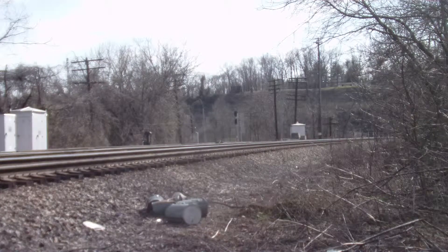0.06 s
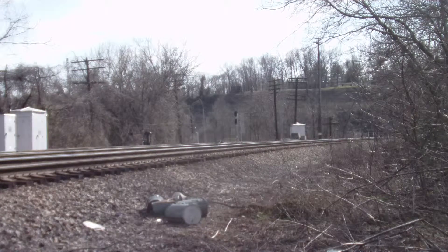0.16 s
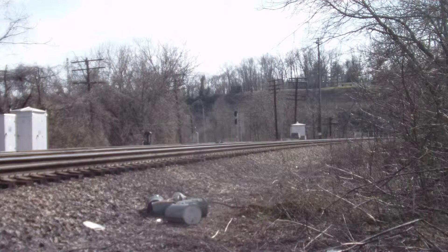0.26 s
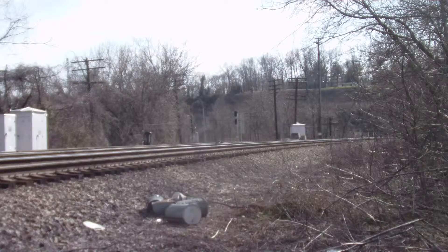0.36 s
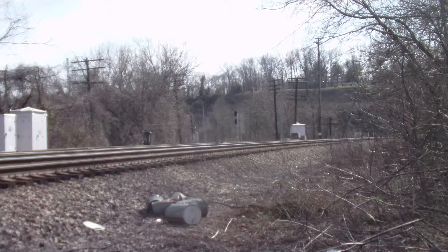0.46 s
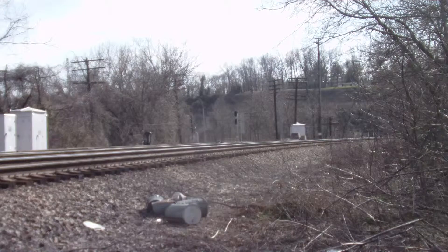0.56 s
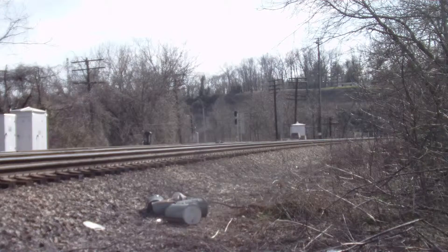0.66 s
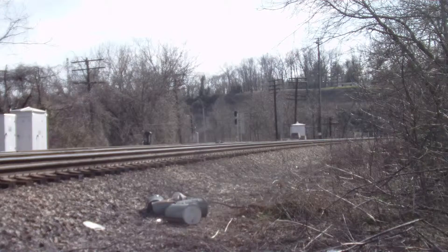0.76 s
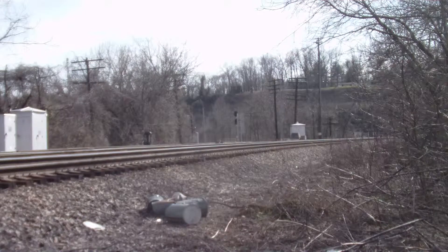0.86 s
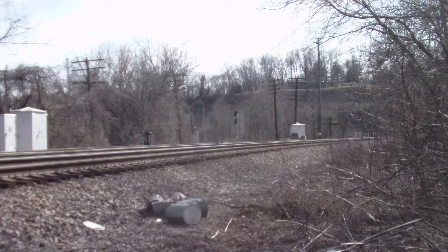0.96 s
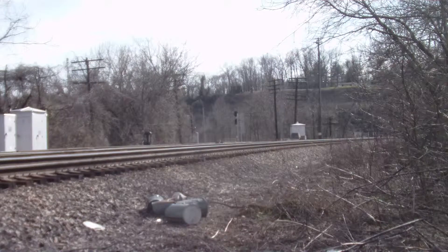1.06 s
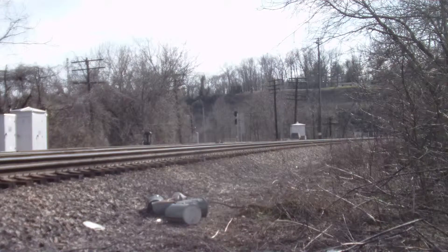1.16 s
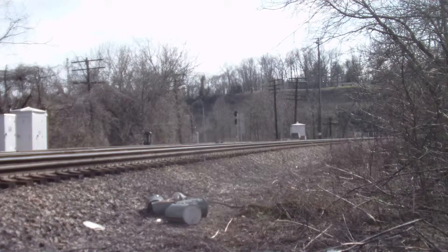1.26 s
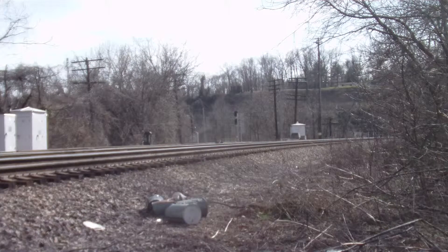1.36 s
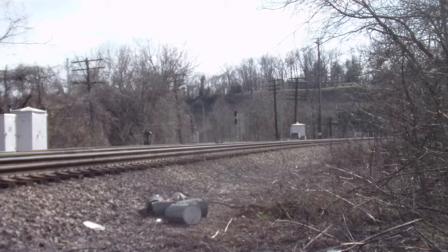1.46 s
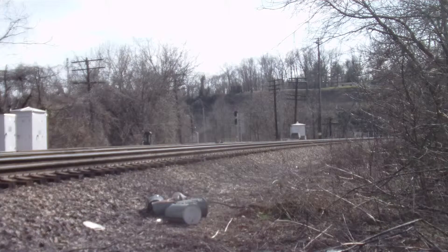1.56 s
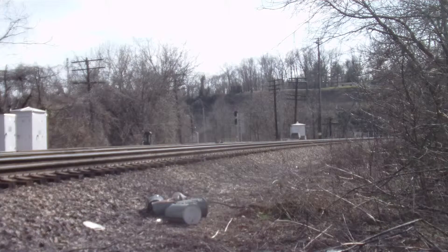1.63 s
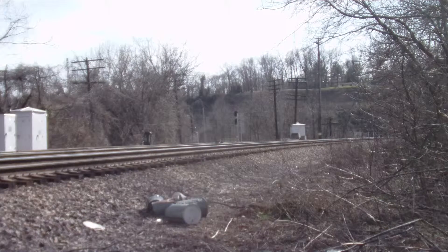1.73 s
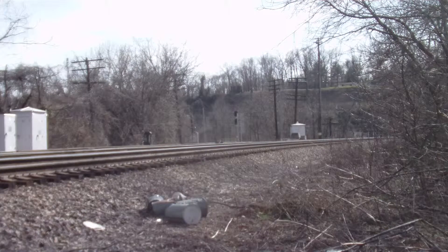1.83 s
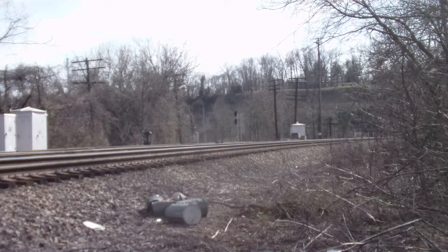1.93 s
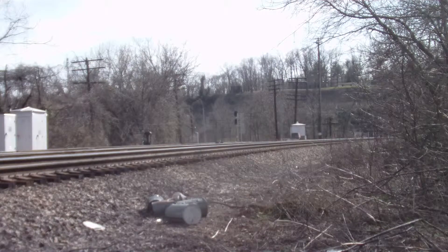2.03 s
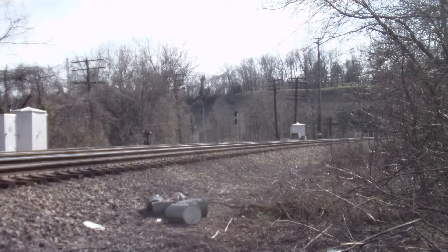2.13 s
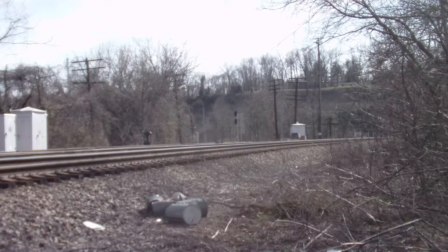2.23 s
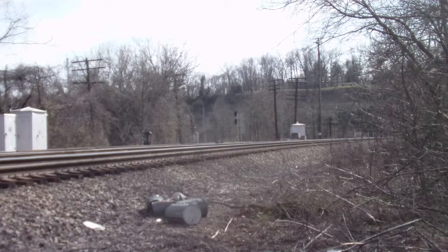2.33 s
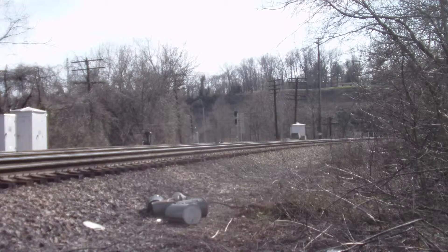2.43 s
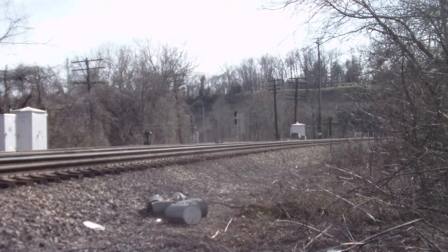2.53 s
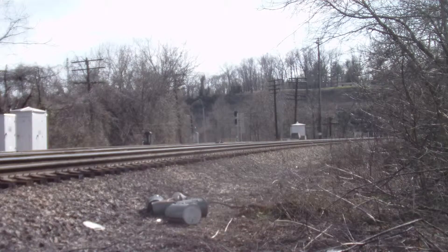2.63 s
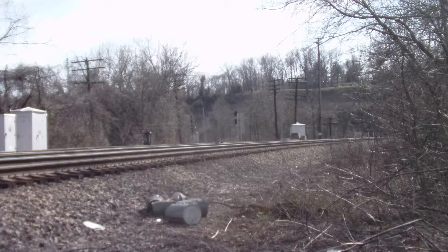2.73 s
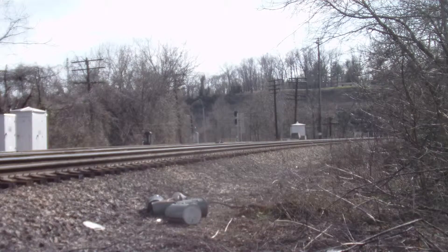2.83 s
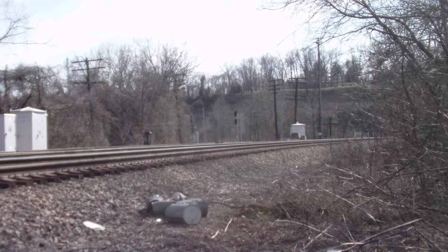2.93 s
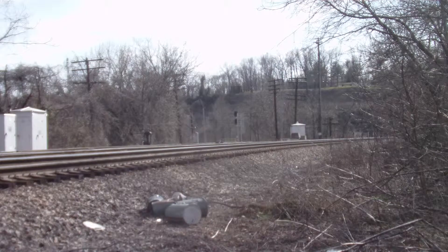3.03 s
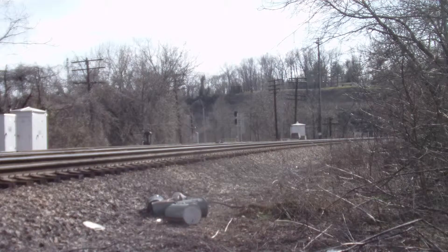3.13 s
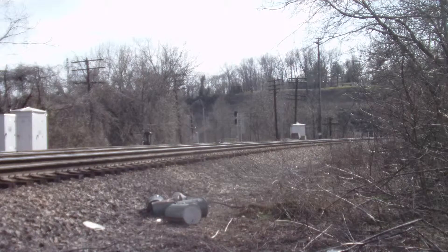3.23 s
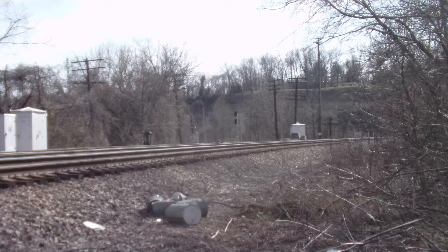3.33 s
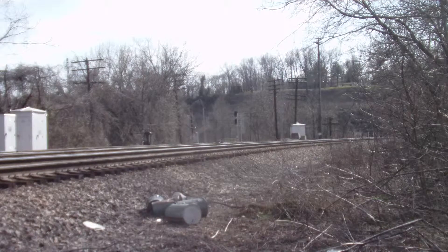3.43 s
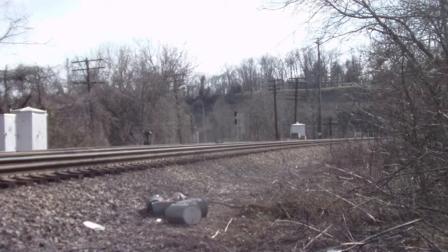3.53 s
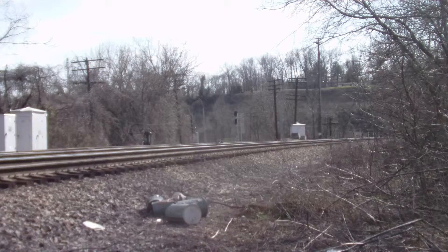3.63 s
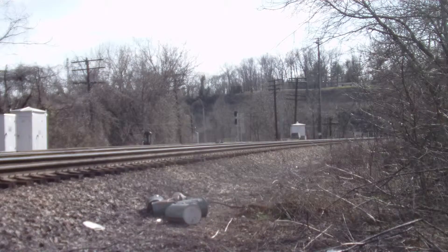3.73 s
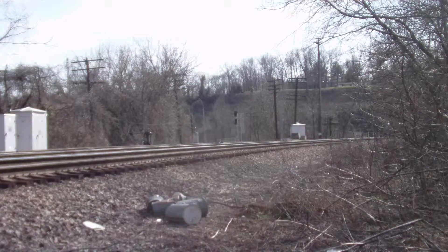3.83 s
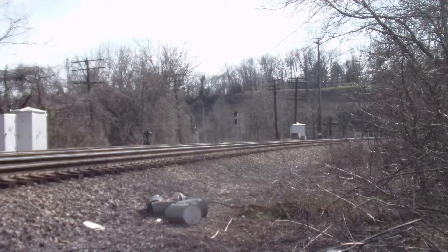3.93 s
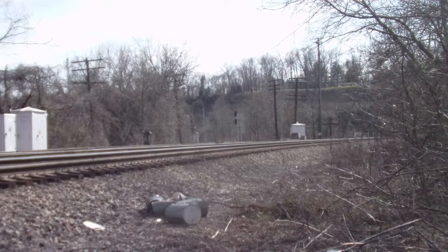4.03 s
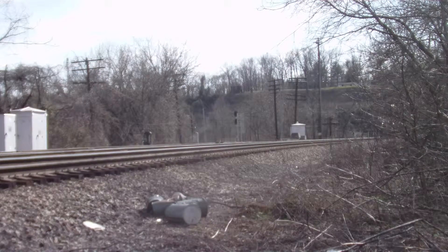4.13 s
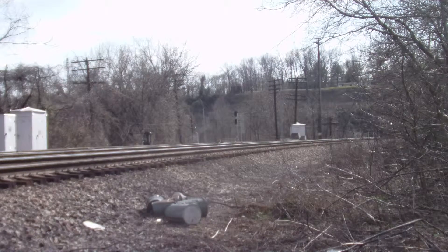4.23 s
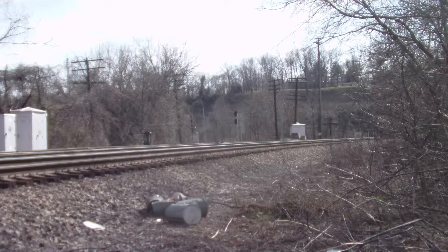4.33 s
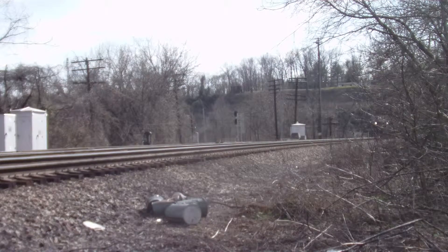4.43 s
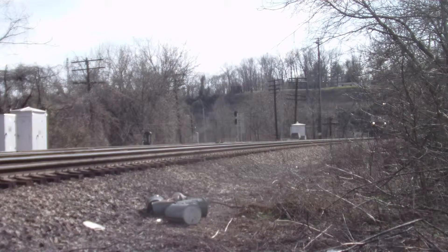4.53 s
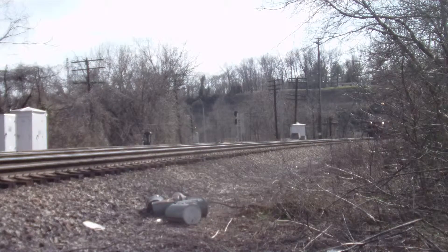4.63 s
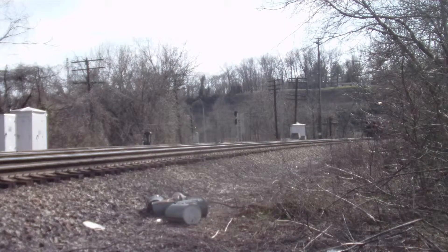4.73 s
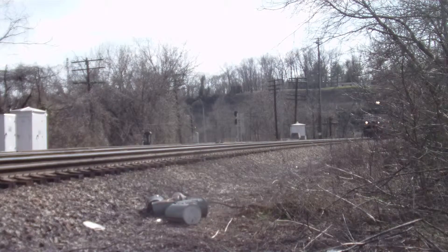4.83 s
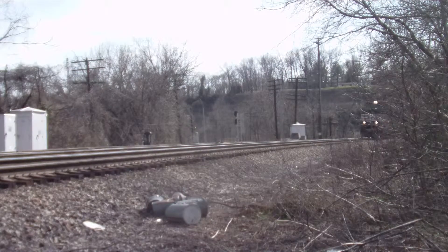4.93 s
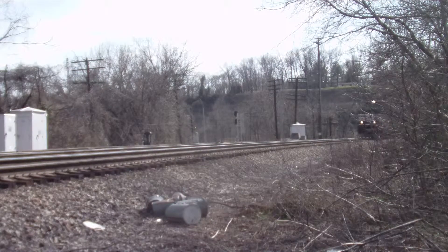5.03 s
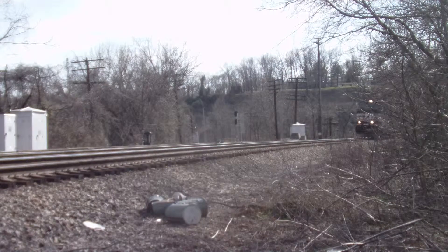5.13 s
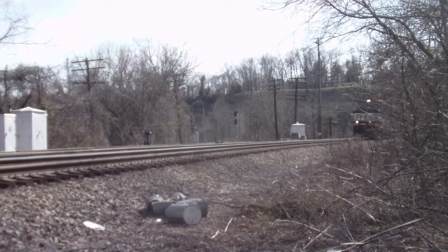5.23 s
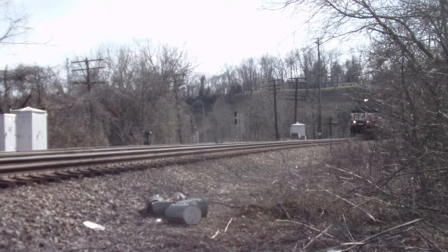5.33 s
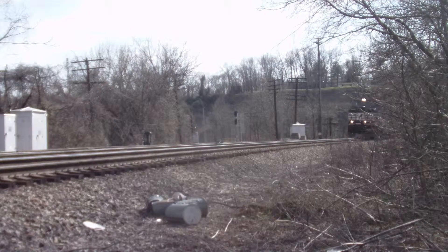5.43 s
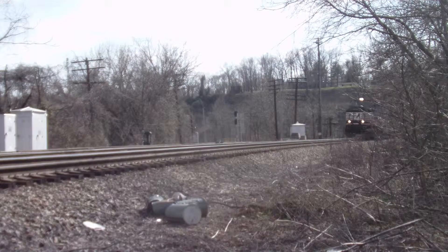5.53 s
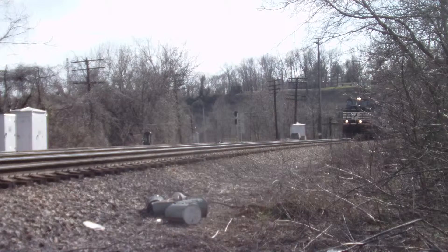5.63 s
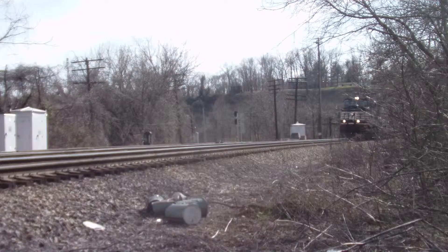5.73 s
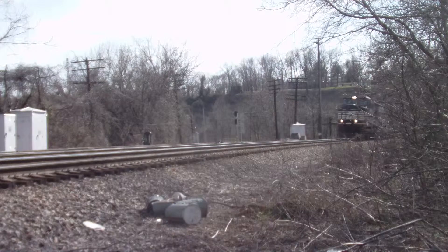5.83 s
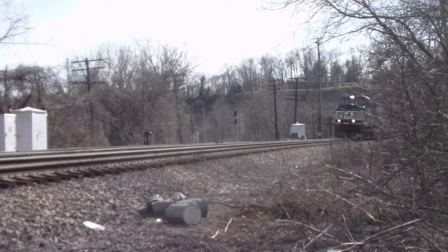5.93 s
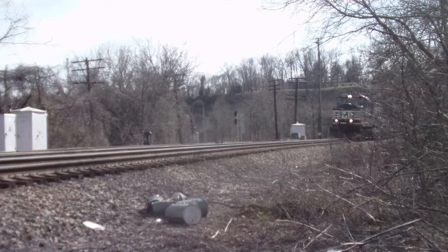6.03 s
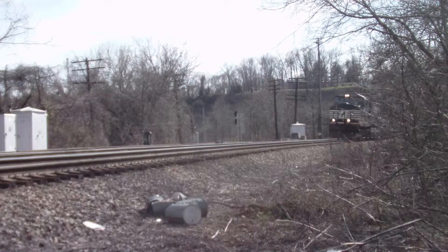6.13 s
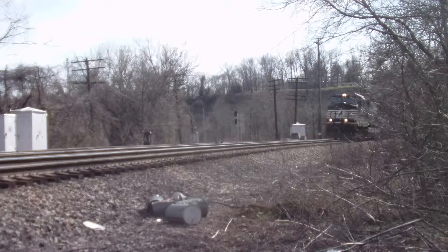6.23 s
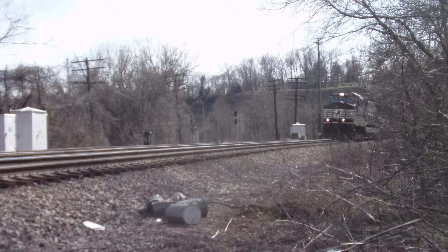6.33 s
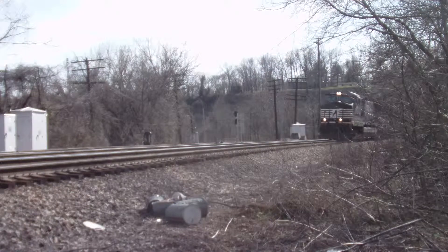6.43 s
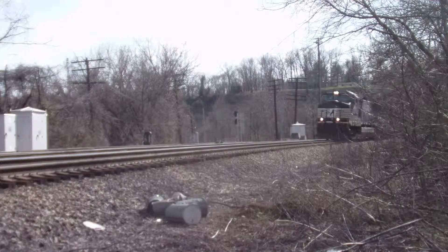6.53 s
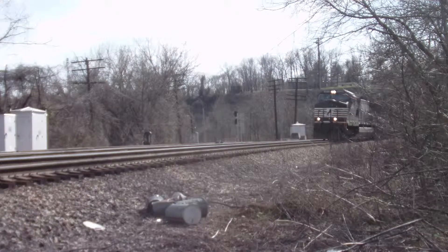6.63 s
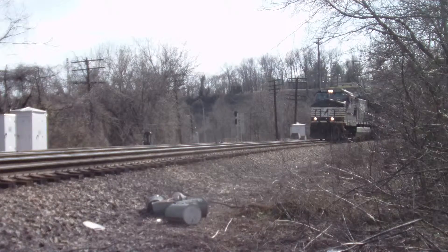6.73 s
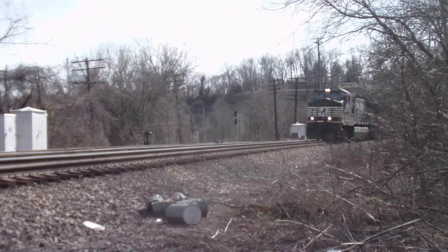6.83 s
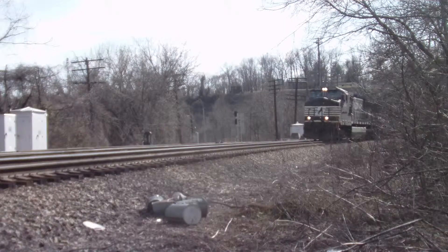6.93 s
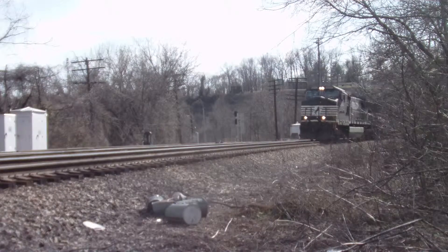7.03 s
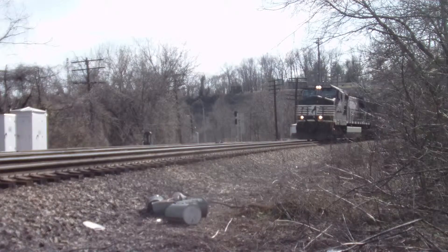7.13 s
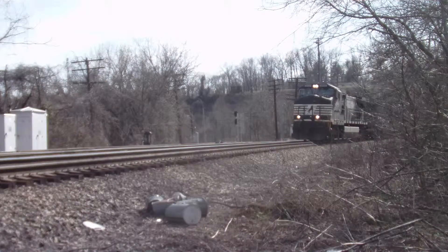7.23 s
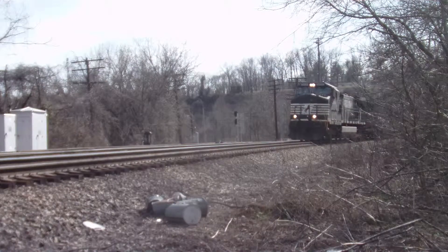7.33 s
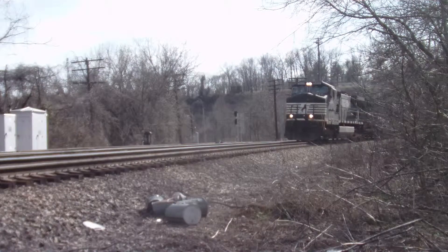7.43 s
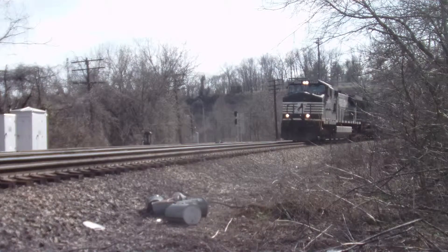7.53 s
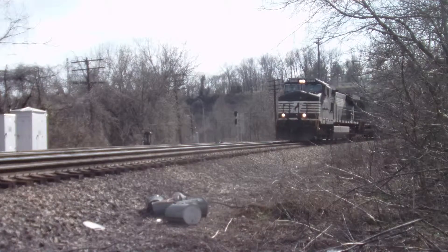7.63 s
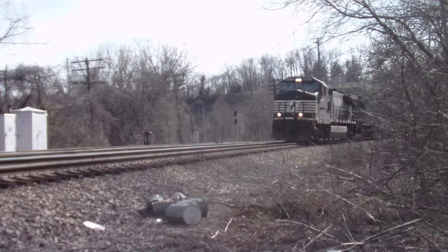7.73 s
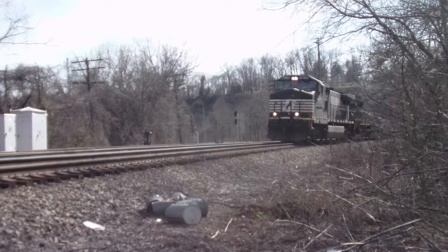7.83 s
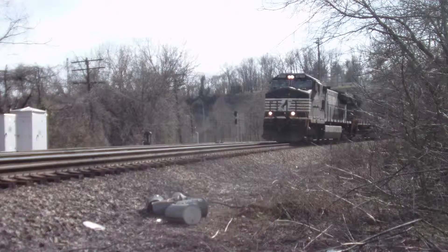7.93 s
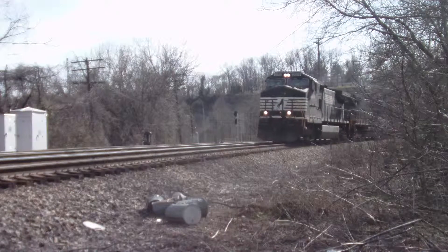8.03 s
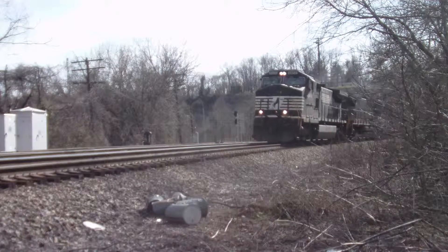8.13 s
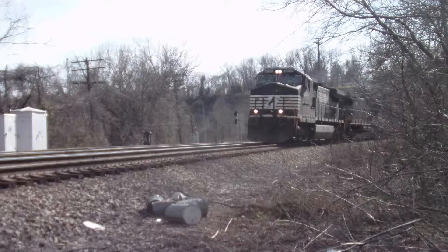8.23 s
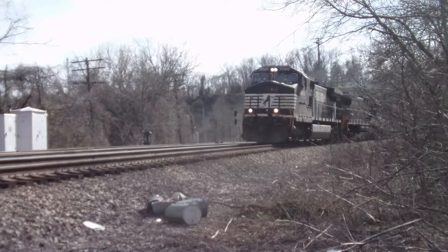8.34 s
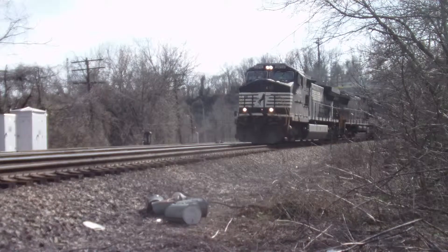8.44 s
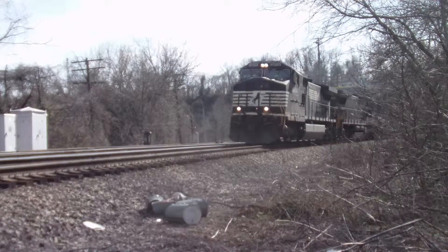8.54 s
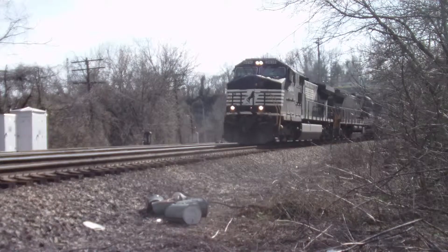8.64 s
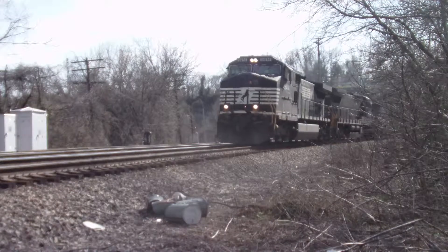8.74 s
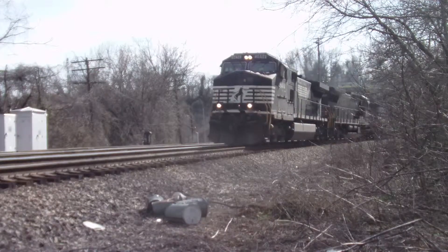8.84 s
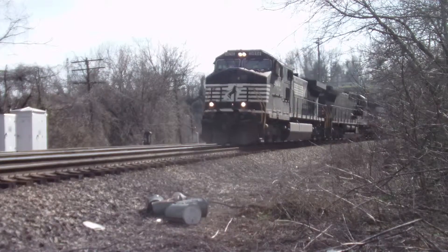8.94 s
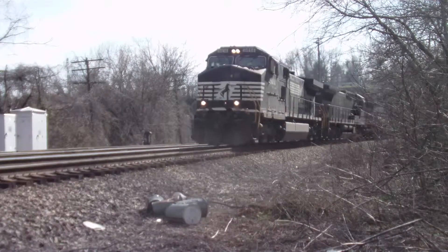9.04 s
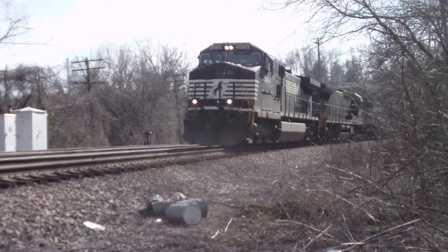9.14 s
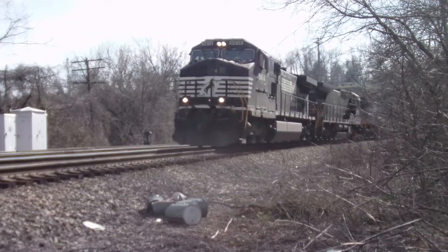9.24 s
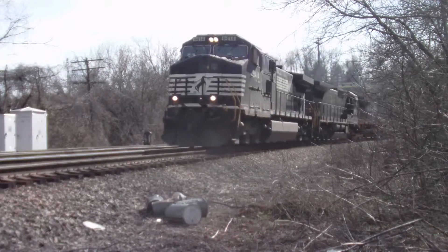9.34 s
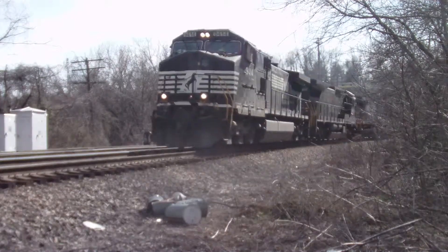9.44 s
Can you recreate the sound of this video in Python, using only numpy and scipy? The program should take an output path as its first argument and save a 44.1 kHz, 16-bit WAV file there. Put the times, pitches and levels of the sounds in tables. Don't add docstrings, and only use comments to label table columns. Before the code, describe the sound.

Beside a railway curve, hissing, thinly singing rails announce a heavy diesel freight train whose rumble and throbbing engines swell close and overload the microphone.

```python
import sys
import numpy as np
from scipy import signal
from scipy.fft import rfft, irfft, next_fast_len
from scipy.io import wavfile
from scipy.ndimage import uniform_filter1d, map_coordinates

SR = 44100
rng = np.random.default_rng(int(sys.argv[2]) if len(sys.argv) > 2 else 0)


def master(y):
    cut = np.clip(np.atleast_2d(y).T, -1, 1)
    pcm = np.round(cut * 32767)
    wavfile.write(sys.argv[1], SR, pcm.astype(np.int16))


def gain_from_db(level_db):
    decades = np.asarray(level_db, float) / 20
    return 10 ** decades


N = 417627


def unit(x):
    return x / np.sqrt(np.mean(x ** 2) + 1e-20)


def along(points, hz):
    f, v = np.transpose(points)
    return np.interp(np.log(hz + 1), np.log(f + 1), v)


def curves(rows):
    s, *cols = np.transpose(rows)
    return [np.interp(np.arange(N) / SR, s, c) for c in cols]


def wobble(rate, n=N):
    at = np.arange(0, n + 16, 16)
    knots = rng.standard_normal(int(n * rate / SR) + 5)
    return np.interp(np.arange(n), at, map_coordinates(knots, [at * rate / SR]))


def filtered(x, response):
    m = next_fast_len(N + 8192)
    return irfft(rfft(x, m) * response(np.fft.rfftfreq(m, 1 / SR)), m)[:N]


def patches(shape, bins, frames):
    field = uniform_filter1d(rng.standard_normal(shape), bins, 0)
    return unit(uniform_filter1d(field, frames, 1))


def rush(gain, patchy_db, streaky_db):
    z = signal.stft(rng.standard_normal(N + 4096), nperseg=2048)[2]
    field = patchy_db * patches(z.shape, 20, 5)
    field += streaky_db * patches(z.shape, 2, 36)
    x = signal.istft(z * gain_from_db(field), nperseg=2048)[1][:N]
    response = gain if callable(gain) else lambda hz: gain_from_db(along(gain, hz))
    return unit(filtered(x, response))


def ringing(modes, width_hz, patchy_db):
    def response(f):
        resonances = [gain_from_db(db) * width_hz * f / np.hypot(hz * hz - f * f, width_hz * f) for hz, db in modes]
        return sum(resonances) ** 1.23
    return rush(response, .35 * patchy_db, .8 * patchy_db)


def tone(hz, drift_rad, rate, n=N):
    phase = 2 * np.pi * (hz * np.arange(n) / SR + rng.random())
    return np.sqrt(2) * np.sin(phase + drift_rad * wobble(rate, n))


def singing(notes, waver_db, drift_rad, rate):
    out = np.zeros(N)
    for start, end, hz, db in notes:
        a = round(max(start - .08, 0) * SR)
        b = min(round((end + .08) * SR), N)
        corners = [start - .08, start + .03, (start + end) / 2, end - .02, end + .08]
        swell_db = np.interp(np.arange(a, b) / SR, corners, [-22, -6, 0, -6, -22])
        waver = waver_db * (wobble(11, b - a) + wobble(1.5 * rate, b - a))
        out[a:b] += gain_from_db(db - 1.5 + swell_db + waver) * tone(hz, drift_rad, rate, n=b - a)
    return out


def bursts(rows, rise_s, rest_db):
    t = np.arange(0, N, 64) / SR
    power = np.zeros(len(t))
    for start, hold, db, fade in rows:
        rise_db = 30 * np.clip(1 - (t - start) / rise_s, 0, 4)
        fade_db = fade * np.clip(t - start - rise_s - hold, 0, None)
        power += gain_from_db(2 * (db - rise_db - fade_db))
    return 10 * np.log10(np.interp(np.arange(N) / SR, t, power) + gain_from_db(2 * rest_db))


# time in seconds, gain from shrinking distance in dB,
# gain from leaving the trees in dB, lead exhaust level in dB, second exhaust level in dB.
APPROACH = [(0.0, 0.5, 0.5, -34, -32), (0.4, 0.5, -0.5, -29.5, -30.5), (1.61, 0.5, .5, -29, -24.5),
            (3.0, 0.5, 2.5, -21, -33.5), (3.82, -0.5, 4, -24, -22), (5.3, 0.5, 9.5, -20.5, -30.5),
            (6.1, 0.5, 10, -23, -22), (7.1, 2.5, 13, -20, -23), (7.7, 2.5, 13.5, -19.5, -29.5),
            (8.3, 4, 15, -16.5, -23), (9.02, 6.5, 17.5, -16, -17.5), (9.47, 7.5, 18.5, -14, -16.5)]


def approach():
    return curves(APPROACH)


# frequency in Hz, level in dB (per Hz).
RUMBLE = [(12, -40), (20, -2), (80, 3), (110, -14), (140, -21), (180, -1.5), (310, -120)]
ROAR = [(74, -18), (125, -1.5), (269, -13.5), (360, -12), (404, -19.5), (467, -15.5), (780, -24),
        (1010, -87), (1720, -120)]
MACHINERY = [(430, -8.5), (730, -4.5), (833, -2), (943, 2.5), (1180, -1.5), (1290, -4), (1500, -7),
             (1950, -12.5), (3300, -120)]
FANS = [(820, -31), (1400, -6.5), (1780, 0.5), (2390, -2.5), (2610, -6.5), (2820, -2.5), (3240, -5),
        (3630, -9), (4680, -14), (4800, -23), (6240, -22), (10600, -120)]
# frequency in Hz, level in dB.
ROLLING_WHEELS = [(1055, 6.5), (1162, 2.5), (1600, 0), (1760, -4), (2400, -8), (2905, -21), (3140, -1),
                  (3390, -3.5), (4130, -9)]
CAR_BODIES = [(243, 0), (322, 1)]


def rolling_roar():
    near_db, clear_db = approach()[:2]
    rumble_db = -33 + 0.3 * clear_db
    roar_db = -30 + near_db
    machinery_db = -42 + 0.73 * clear_db
    fans_db = -50.5 + clear_db
    noise = gain_from_db(rumble_db) * rush(RUMBLE, patchy_db=1.5, streaky_db=0)
    noise += gain_from_db(roar_db + 0.13) * rush(ROAR, patchy_db=-0.7, streaky_db=1.0)
    noise += gain_from_db(machinery_db - 2.4) * rush(MACHINERY, patchy_db=-0.6, streaky_db=1.5)
    noise += gain_from_db(fans_db - 1.12) * rush(FANS, patchy_db=1.0, streaky_db=1.5)
    noise += gain_from_db(fans_db - 4.0) * ringing(ROLLING_WHEELS, width_hz=22, patchy_db=0)
    noise += gain_from_db(roar_db - 15) * ringing(CAR_BODIES, width_hz=14, patchy_db=2)
    return noise


# start in seconds, end in seconds, frequency in Hz, rms level in dB.
GEAR_DRONES = [(3, 4.35, 193.5, -35), (4.0, 6.4, 143.1, -28.5), (4.6, 8.0, 155.9, -31),
               (5.9, 7.3, 183.6, -33.5), (6.3, 9.4, 141.4, -30), (8.4, 9.2, 230, -34),
               (8.7, 9.4, 194.3, -36), (6.6, 8.1, 366, -40.5), (7.7, 8.2, 366, -44), (8.4, 10, 366, -33.5),
               (6.1, 6.6, 452, -38.5), (6.5, 7.7, 452, -49), (8.2, 9.4, 452, -43), (2.7, 4.5, 69, -28),
               (3.2, 4.4, 113, -29), (0.6, 2.4, 113, -32), (5.9, 7.6, 78, -26)]


def gear_drones():
    return singing(GEAR_DRONES, waver_db=1.5, drift_rad=0.46, rate=2.85)


# start in seconds, hold in seconds, level in dB, fade in dB a second.
SCRUBS = [
    (3.1, 0.1, -66, 33),
    (4.08, 0.12, -61, 24),
    (4.54, 0.25, -51, 15),
    (5.0, 0.37, -56, 70),
    (6.55, 0.17, -51, 17),
    (7.06, 0.2, -41.5, 18),
    (8.07, 0.11, -39, 22),
    (8.76, 0.043, -35, 60),
    (9.1, .05, -39, 5),
    (9.27, 0.15, -30, 20),
]
# frequency in Hz, level in dB per Hz.
SCRUB_COLOUR = [(1500, -44), (3290, -4), (5600, -4.5), (6460, -4), (6540, -3.5), (8400, -8), (10300, -10.5),
                (13400, -48), (22000, -120)]


def wheel_scrub():
    near_db, clear_db = approach()[:2]
    rest_db = -71 + 1.68 * near_db + 1.235 * clear_db
    scrub_db = bursts(SCRUBS, rise_s=0.16, rest_db=rest_db) + .8 * wobble(7)
    return gain_from_db(scrub_db + 3.0) * rush(SCRUB_COLOUR, patchy_db=.8, streaky_db=1.5)


# start in seconds, hold in seconds, hiss level in dB, fade in dB a second.
BITES = [(0.0, 0.32, -46, 21), (0.63, 0.058, -40, 33), (1.03, 0.28, -40, 40), (1.45, 0.5, -41.5, 21),
         (2.32, 0.12, -44, 30), (2.5, 0.34, -42, 27), (2.95, 0.29, -40, 20), (3.48, 0.24, -43, 22),
         (3.92, 0.061, -33, 68), (4.35, 0.59, -31, 31), (5.18, 0.067, -36, 50), (5.66, 0.028, -37, 50),
         (5.97, 0.099, -39, 50), (6.34, 0.24, -34, 70), (6.77, .05, -39, 70), (6.94, 0.17, -30, 19),
         (7.76, 0.041, -35.5, 70), (8.05, 0.52, -33, 22), (8.64, 0.037, -31, 39), (8.78, 0.054, -28.5, 53),
         (8.98, 0.28, -35, 30), (9.26, 0.11, -24.5, 19)]
# frequency in Hz, level in dB per Hz.
TOP_COLOUR = [(10500, -38), (11500, -21), (12300, -17), (12750, -11), (13150, -13), (13640, -9),
              (13760, -2), (14500, 0), (15100, -2), (15400, -4)]
EDGE_COLOUR = [(5530, -51), (9400, -28), (10300, -14), (10900, 6.5), (11600, 11), (12100, 4), (15700, -19),
               (22000, -120)]
# frequency in Hz, level in dB.
TOP_MODES = [(13243, -66), (13469, -65), (13561, -64), (13711, -62), (13792, -57), (13937, -52),
             (14040, -59), (14174, -55), (14280, -55), (14400, -57), (14465, -56), (14675, -55),
             (14831, -57), (14976, -57)]
LOWER_MODES = [(11461, -70), (11741, -66), (11892, -62), (12053, -66), (12285, -63), (12360, -63),
               (12468, -61), (12570, -63), (12694, -59), (12807, -61), (12871, -59), (12931, -61),
               (13297, -57), (13410, -62)]
EDGE_MODES = [(9330, -11), (9620, -7), (10100, -9), (10240, -5), (10420, -8), (10575, -5), (10700, -6),
              (10845, -2), (10990, -3), (11100, -2), (11165, 0), (11250, -3), (11322, 2), (11400, -1)]
FAINT_MODES = [(8120, -3), (8250, -2), (8330, -2), (10600, 2)]


def flange_hiss():
    t = np.arange(N) / SR
    rest_db = -47 + t
    top_db = bursts(BITES, rise_s=0.042, rest_db=rest_db) + .9 * wobble(9)
    edge_db = top_db - 30 + 1.94 * t + 0.28 * (top_db - rest_db)

    hiss = gain_from_db(top_db - 1.5) * rush(TOP_COLOUR, patchy_db=.5, streaky_db=3.5)
    modes = TOP_MODES + [(hz, db + 4) for hz, db in LOWER_MODES]
    hiss += gain_from_db(top_db - 6) * ringing(modes, width_hz=12, patchy_db=4)

    corner_hz, first_loss_db, clearing_s, upper_db = 13300, 7, 3.6, 1.5
    lower = filtered(hiss, lambda hz: 1 / (1 + (hz / corner_hz) ** 40))
    lower_gain = gain_from_db(-first_loss_db * np.clip(1 - t / clearing_s, 0, 1))
    hiss = gain_from_db(upper_db) * hiss + (lower_gain - gain_from_db(upper_db)) * lower

    hiss += gain_from_db(top_db - 35.5 - 1.2 * t) * ringing(FAINT_MODES, width_hz=40, patchy_db=3)
    hiss += gain_from_db(edge_db - 3) * rush(EDGE_COLOUR, patchy_db=0.5, streaky_db=5.5)
    hiss += gain_from_db(edge_db - 8 + .4 * t) * ringing(EDGE_MODES, width_hz=13, patchy_db=4)
    return hiss


# start in seconds, end in seconds,
# frequency in Hz, rms level in dB.
WHEEL_TONES = [(-.1, 0.36, 1160, -44), (0.5, 0.8, 1157, -49), (0.75, 1.2, 1157, -45),
               (1.38, 1.6, 1157, -48), (1.65, 2.05, 1158, -49), (1.78, 2.1, 1815, -56),
               (3.15, 3.7, 1160, -51), (3.7, 4.2, 1160, -49), (6.55, 6.95, 4334, -50),
               (7.8, 8.1, 4334, -52), (8.2, 8.7, 7900, -50), (8.2, 8.28, 7000, -47), (9.3, 9.6, 7900, -42),
               (4.2, 4.79, 3383, -56), (4.74, 5.09, 6238, -54), (4.7, 5.2, 1160, -43),
               (4.86, 5.15, 3413, -54), (5.29, 5.58, 6227, -58), (5.2, 5.7, 3384, -54),
               (5.3, 5.42, 4334, -53), (5.39, 5.55, 4334, -46), (5.64, 6.05, 2391, -49),
               (5.22, 5.46, 2391, -51), (5.47, 5.58, 2391, -41), (5.55, 5.68, 2391, -39.5),
               (5.63, 5.72, 4333, -50), (5.92, 6.2, 1161, -42), (7.3, 7.36, 1595, -37),
               (7.39, 7.45, 1595, -37), (6.55, 7.0, 1600, -45), (7.02, 7.16, 1160, -40),
               (8.21, 8.37, 8877, -50), (8.64, 9.08, 1048, -37), (9.03, 9.22, 1701, -36),
               (9.03, 9.22, 1755, -39), (9.03, 9.22, 1970, -43), (8.9, 9.4, 2112, -46),
               (9.15, 9.6, 1166, -37), (9.2, 9.6, 1057, -37), (6.25, 6.6, 1040, -42)]
RAIL_TONES = [(3.93, 4.2, 9620, -59), (4.4, 5.3, 9620, -59), (5.45, 5.9, 10241, -64),
              (1.3, 2.0, 11892, -60), (4.0, 4.3, 11892, -52), (1.52, 2.0, 13933, -51),
              (1.64, 2.13, 12929, -55), (3.56, 3.96, 11893, -52), (4.4, 4.91, 11321, -51),
              (4.54, 4.91, 12247, -50), (4.56, 4.95, 12359, -45), (4.79, 5.13, 11740, -49),
              (5.2, 5.51, 11899, -50), (5.69, 6.28, 11892, -47), (6.0, 6.46, 11735, -52),
              (6.33, 6.69, 11896, -46), (5.35, 5.6, 10241, -60), (6.3, 6.6, 10241, -56),
              (6.6, 7.21, 10241, -51), (7.0, 7.15, 9620, -50), (6.1, 6.3, 10845, -57),
              (6.77, 7.17, 11155, -47), (6.98, 7.28, 13297, -41), (7.18, 7.36, 11893, -44),
              (7.33, 7.6, 10241, -44), (7.42, 7.66, 11155, -45), (7.46, 7.69, 9328, -46),
              (7.72, 7.96, 10240, -44), (7.76, 7.97, 13940, -43), (7.97, 8.41, 10239, -50),
              (8.06, 8.28, 13934, -41), (8.2, 8.56, 11740, -48), (8.22, 8.63, 13297, -43),
              (8.22, 8.48, 12870, -39), (8.42, 8.81, 12285, -48), (8.78, 9.09, 13303, -42)]
WHEEL_WHINES = [(0.0, 1.3, 3141, -62), (1.4, 1.75, 2896, -59), (1.65, 2.0, 2896, -57),
                (2.56, 2.74, 2896, -53), (3.38, 3.66, 2896, -53), (1.97, 2.12, 2896, -52),
                (2.12, 2.33, 2896, -52), (2.34, 2.52, 2896, -53), (2.7, 3.0, 2896, -54),
                (3.0, 3.4, 2896, -54), (3.66, 3.86, 2899, -49), (3.9, 4.2, 2899, -55),
                (4.15, 4.36, 2900, -48), (4.22, 4.5, 3139, -53), (4.37, 4.97, 2892, -53),
                (5.28, 5.64, 2906, -52), (5.79, 6.05, 3137, -51), (6.04, 6.48, 2901, -49),
                (6.54, 7.27, 2908, -48), (6.61, 7.6, 3142, -46), (7.96, 8.7, 3140, -44),
                (8.16, 8.46, 2916, -45), (8.7, 9.4, 3131, -39)]


def thin_tones():
    tones = singing(WHEEL_TONES, waver_db=1.3, drift_rad=.8, rate=24)
    tones += singing(RAIL_TONES, waver_db=2, drift_rad=1.3, rate=26)
    tones += singing(WHEEL_WHINES, waver_db=1.3, drift_rad=.8, rate=24)
    return tones


# time in seconds, level in dB.
CALM_SQUEAL = [
    (0.0, -63.5),
    (2.6, -58.5),
    (3.5, -49),
    (4.6, -50.5),
    (5.3, -42),
    (6.4, -35.5),
    (7.4, -33),
    (8.8, -50),
    (9.47, -36),
]
# start in seconds, hold in seconds, band level in dB,
# fade in dB a second, tone level over the band in dB.
SURGES = [(0.7, .6, -67, 20, -1), (1.7, 0.66, -64.5, 46, -2), (3.13, .65, -66.5, 20, 12),
          (3.912, 0.081, -48, 46, 4.5), (4.657, 0.063, -59, 46, 12.5), (4.872, 0.091, -52, 70, 10.5),
          (5.31, 0.12, -45, 20, -2), (6.425, 0.69, -39, 55, 5), (7.424, 0.15, -41, 200, 10),
          (7.425, 0.73, -32.5, 21, -7), (7.615, 0.36, -45.5, 38, 18), (8.2, 0.09, -43.5, 22, 6.5),
          (8.493, 0.15, -43.5, 61, 8.5), (8.845, 0.27, -39, 74, 4)]
# start in seconds, hold in seconds, level in dB, fade in dB a second.
HUM = [
    (6.58, .2, -48, 30),
    (6.79, .36, -36, 60),
    (7.25, .22, -43, 40),
    (7.49, .15, -33.5, 80),
    (7.78, .12, -44, 40),
    (8.39, .06, -41, 30),
    (8.96, .07, -38, 70),
    (9.24, .2, -39, 30),
]
# start in seconds, hold in seconds, level in dB, fade in dB a second.
TREMBLE = [(4.08, .25, -50, 40), (5.35, .06, -50, 60), (6.4, .15, -48, 10), (6.6, .15, -45, 20),
           (6.845, .085, -35, 110), (7.03, .08, -34, 90), (7.2, .2, -43, 15), (7.47, .15, -32, 75),
           (7.72, .16, -41, 20), (8.2, .08, -43, 40), (8.39, .06, -41, 30), (8.96, .07, -38, 70),
           (9.24, .2, -39, 30)]
# frequency in Hz, level in dB per Hz.
BAND_COLOUR = [(4500, -29), (4870, -15), (4925, -3), (5260, 2), (5320, -4), (5550, -8), (5720, -16),
               (6200, -36.5)]
SIDEBAND_COLOUR = [(3600, -36), (3990, -11), (4060, 0), (4350, 1), (4420, -4), (4600, -6), (4800, -24),
                   (5850, -20), (6000, -9), (6300, -11), (6600, -30)]
# frequency in Hz, level in dB.
BAND_MODES = [(4920, -3), (5000, -2), (5040, -1), (5075, 1), (5130, -1), (5190, -2), (5250, 0), (5350, -6)]


def squeal():
    surge_s, hum_s = 0.061, 0.09
    calm_db, = curves(CALM_SQUEAL)
    band_rows = [row[:4] for row in SURGES]
    tone_rows = [(start, hold, db + over, fade) for start, hold, db, fade, over in SURGES]
    band_db = bursts(band_rows, surge_s, calm_db - 6.0)
    tone_db = bursts(tone_rows, surge_s, calm_db - 7)
    hum_db = bursts(HUM, hum_s, rest_db=-80) + 0.5 * wobble(13)
    side_db = bursts(TREMBLE, hum_s, rest_db=-80) + 0.5

    flutter_db = 1.7 * wobble(30) + .8 * wobble(9)
    line = gain_from_db(tone_db - .6 + flutter_db) * tone(5281, drift_rad=.45, rate=30)
    noise = rush(BAND_COLOUR, patchy_db=.4, streaky_db=2.5)
    noise = unit(noise + .5 * ringing(BAND_MODES, width_hz=18, patchy_db=1.5))
    hum = tone(946, drift_rad=0.5, rate=13)

    shaking = np.clip((hum_db + 68.0) / 8, 0, 1)
    line_sides_db = side_db + 25 - 1.3 * np.clip(-36 - side_db, 0, 10)
    line_sides = gain_from_db(line_sides_db) * shaking * line * hum
    band_sides = unit(filtered(noise * hum, lambda hz: gain_from_db(along(SIDEBAND_COLOUR, hz))))
    band_sides *= gain_from_db(side_db - 1) * np.clip((side_db + 54) / 8, 0, 1)
    return line + gain_from_db(band_db + 2.5) * noise + line_sides + band_sides + gain_from_db(hum_db + 0.5) * shaking * hum


def exhaust(cycle_hz, orders, fading_db, slows=0):
    step = 16
    n = N // step + 2
    t = step * np.arange(n) / SR
    crank = 2 * np.pi * (cycle_hz * t - slows * t * t / 2) + .03 * wobble(.8 * step, n)
    beats = np.zeros(n)
    for multiple, db in orders:
        fading = gain_from_db(db + fading_db * wobble(1.3 * step, n))
        phase = multiple * crank + .7 * rng.standard_normal() + .25 * wobble(.8 * step, n)
        beats -= fading * np.sqrt(2) * np.cos(phase)
    return signal.resample_poly(beats, step, 1)[:N]


# multiple of the cycle, level in dB.
LEAD_ORDERS = [(6, -17), (7, -12), (8, 0), (9, -11), (10, -9), (11, -10), (12, -15), (13, -11), (14, -13),
               (15, -15), (18, -22)]
DEEP_ORDERS = [(3, -8), (4, -14), (5, 0)]
AXLE_ORDERS = [(5, 0), (6, 0), (7, -7), (8, -9)]
SECOND_ORDERS = [(3, -14), (5, -11), (8, -5), (11, 0), (12, -6), (13, -7), (15, -13), (17, -20)]


def locomotive_beats():
    _, clear_db, lead_db, second_db = approach()
    lead_hz, second_hz, axle_hz = 7.677, 8.615, 13.39
    deep_db = -35 + 0.79 * clear_db
    axle_db = -33.5 + 0.34 * clear_db
    beats = gain_from_db(lead_db - 1.0) * exhaust(lead_hz, LEAD_ORDERS, fading_db=1.5)
    beats += gain_from_db(deep_db) * exhaust(lead_hz, DEEP_ORDERS, fading_db=1.5)
    beats += gain_from_db(axle_db) * exhaust(axle_hz, AXLE_ORDERS, fading_db=2.5, slows=.039)
    beats += gain_from_db(second_db - 0.7) * exhaust(second_hz, SECOND_ORDERS, fading_db=1.0)
    return beats


def scene():
    train = rolling_roar() + gear_drones()
    rails = wheel_scrub() + flange_hiss() + thin_tones() + squeal()
    return np.tile(train + rails + locomotive_beats(), (2, 1))


def low_pass(x):
    return signal.sosfilt(signal.butter(12, 15335, fs=SR, output="sos"), x)


def record(dry):
    fade_in = np.clip(np.arange(N) / 100, 0, 1)
    x = np.clip(dry[0], -1, .95) * fade_in
    x = filtered(x, lambda hz: gain_from_db(-.27 * np.clip(hz - 15250, 0, None)))
    return low_pass(np.tile(x, (2, 1)))


dry = scene()
out = record(dry)
master(out)
```